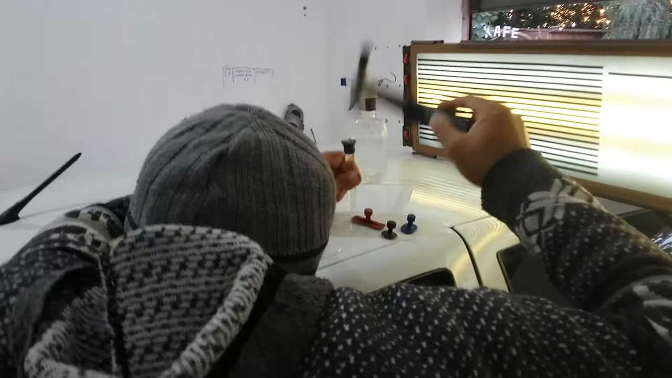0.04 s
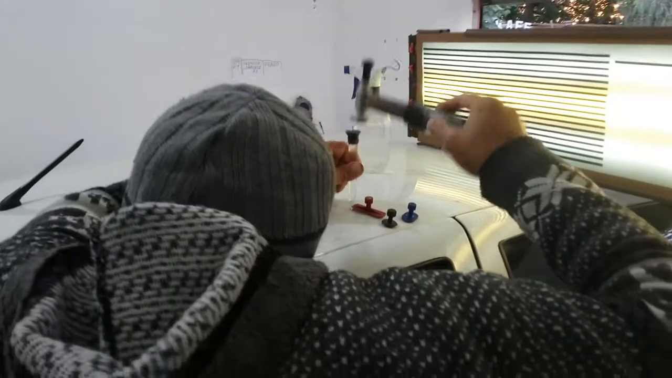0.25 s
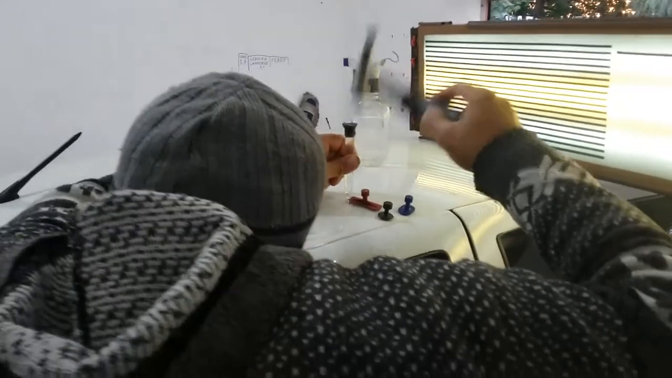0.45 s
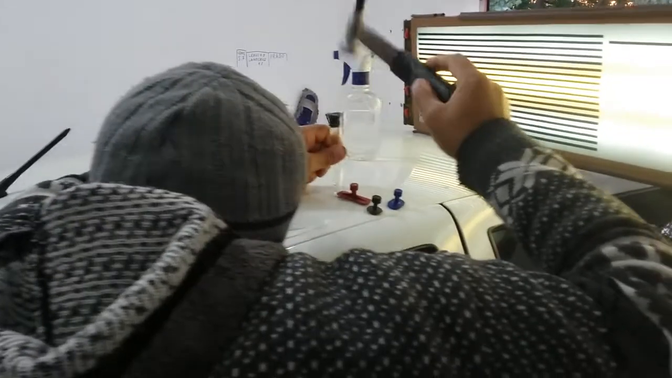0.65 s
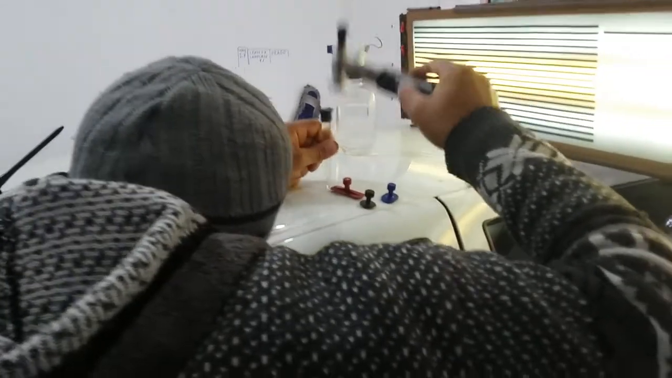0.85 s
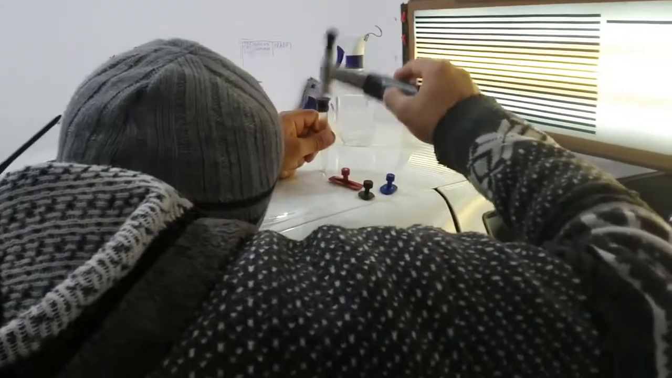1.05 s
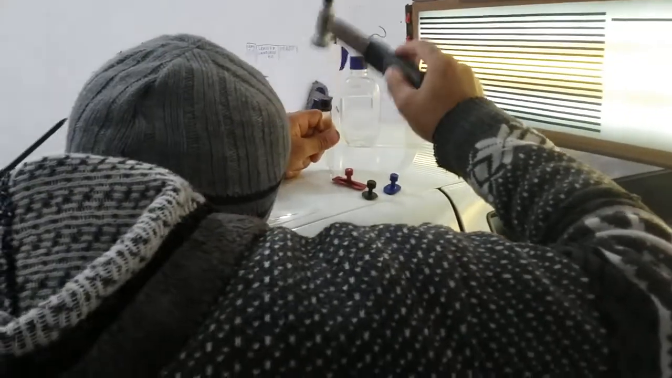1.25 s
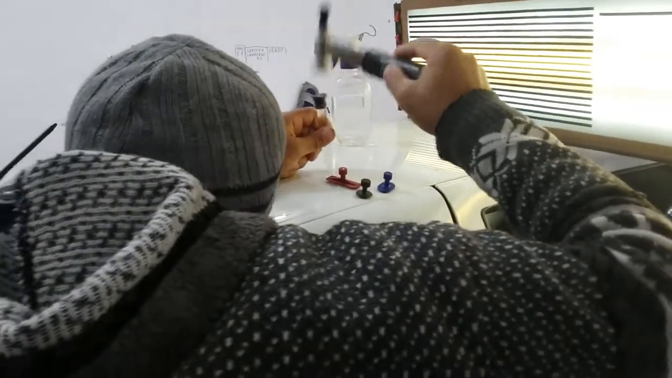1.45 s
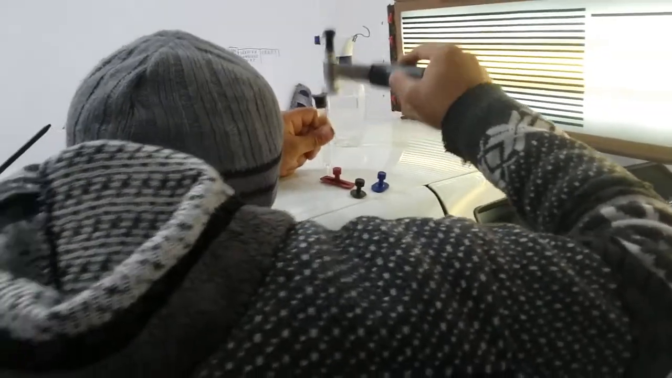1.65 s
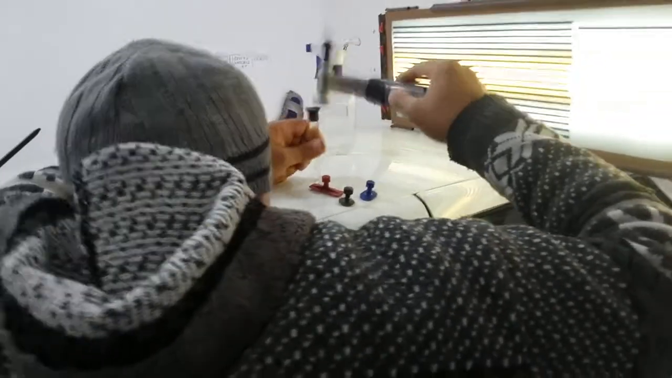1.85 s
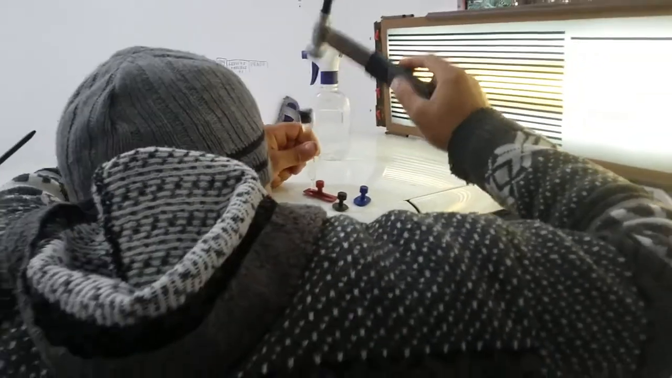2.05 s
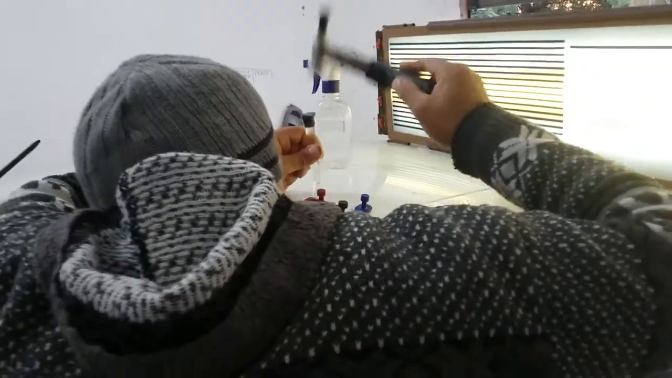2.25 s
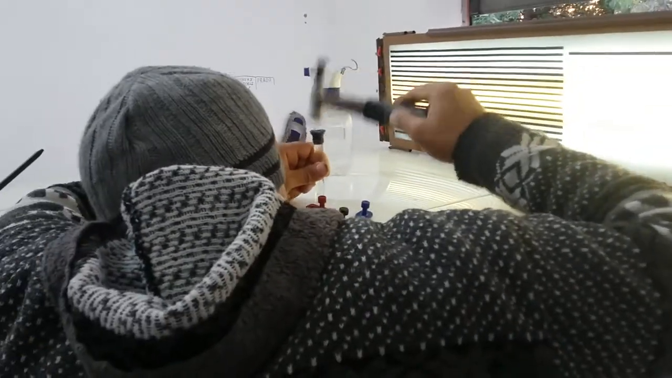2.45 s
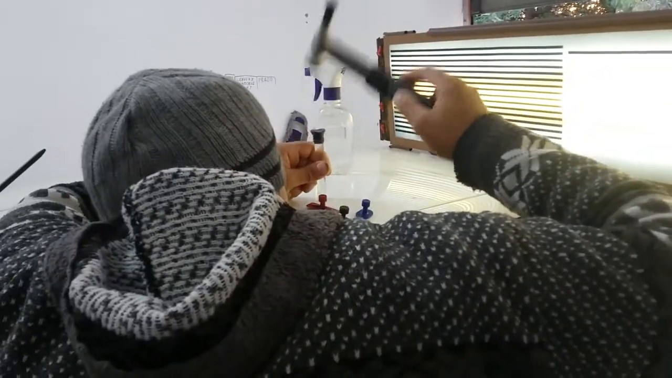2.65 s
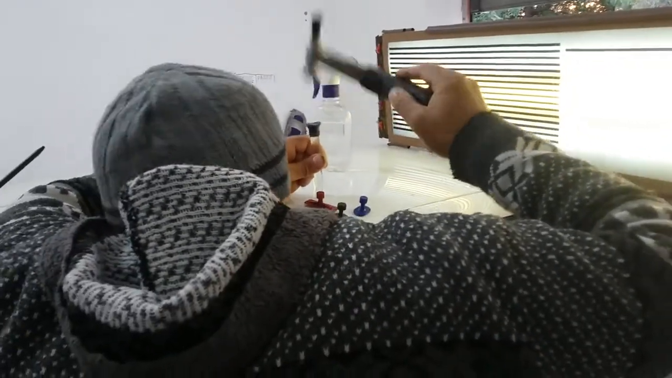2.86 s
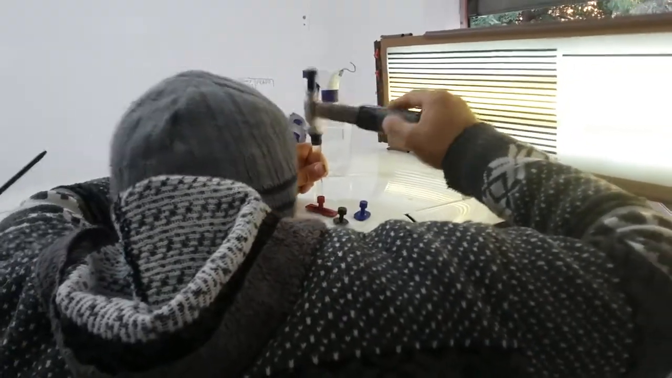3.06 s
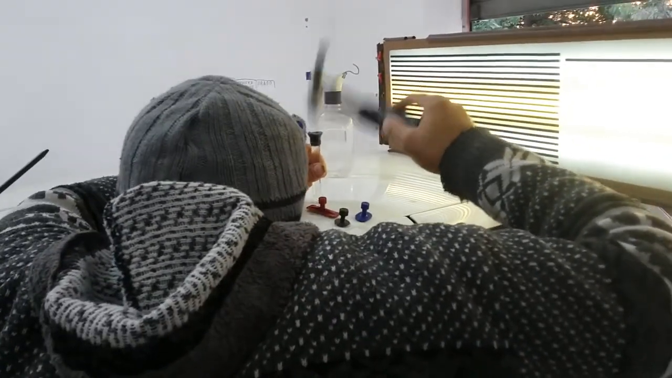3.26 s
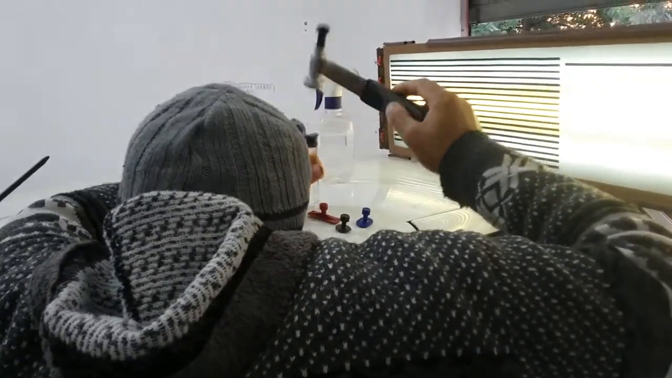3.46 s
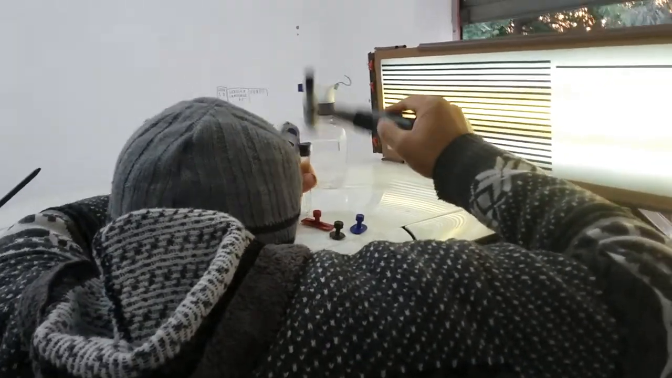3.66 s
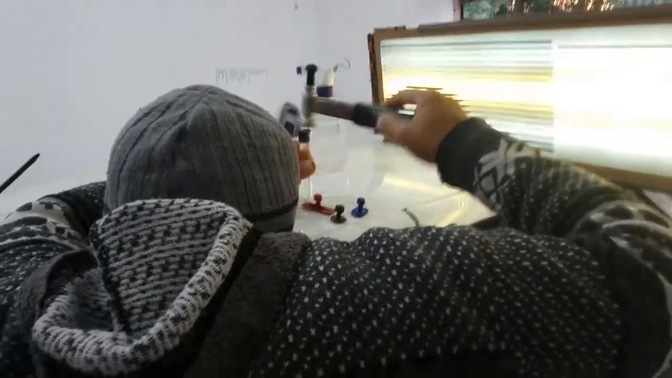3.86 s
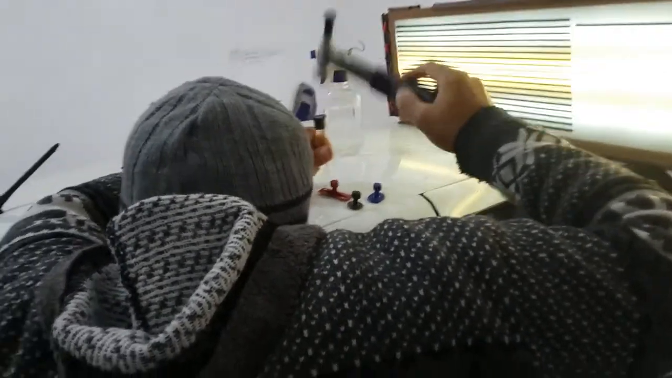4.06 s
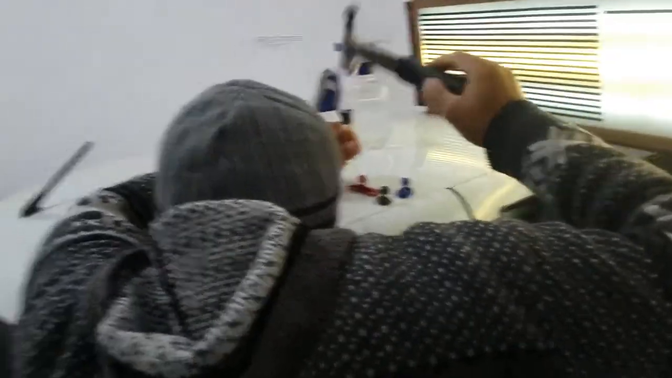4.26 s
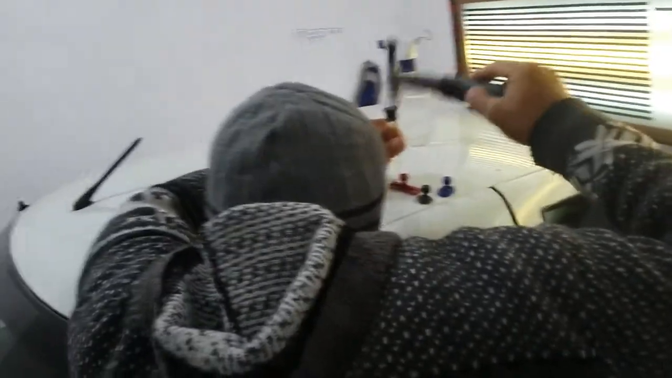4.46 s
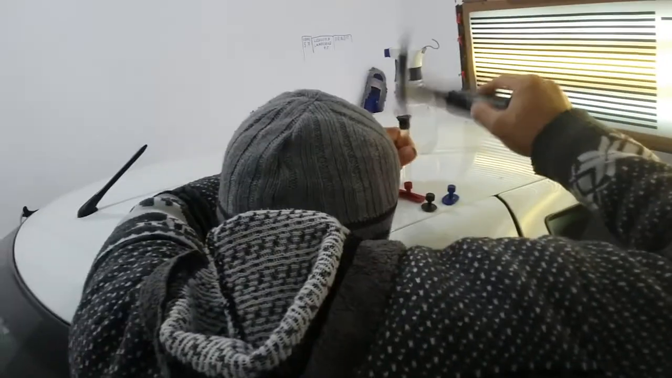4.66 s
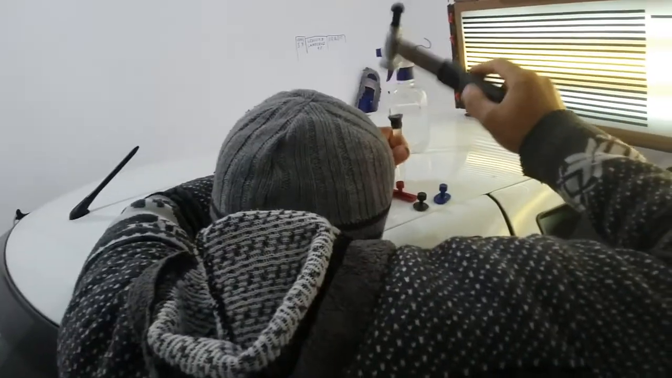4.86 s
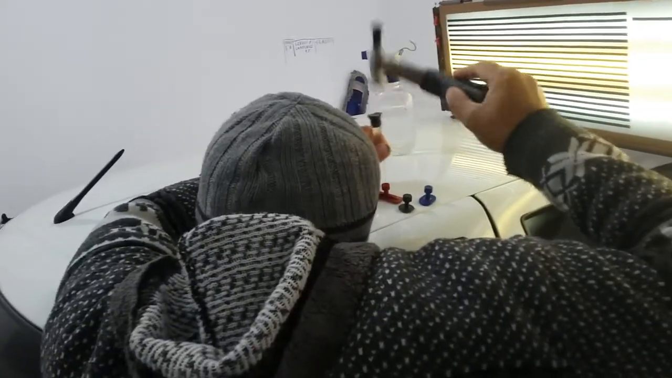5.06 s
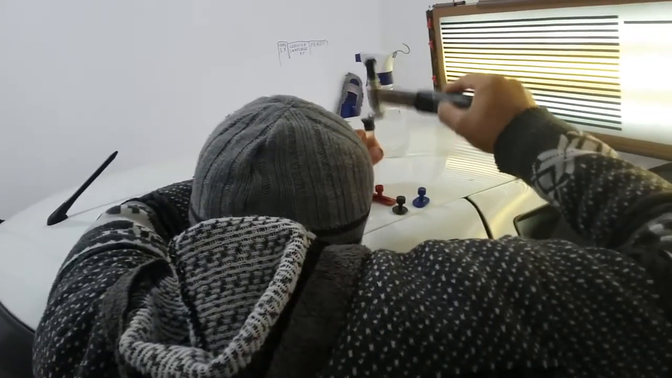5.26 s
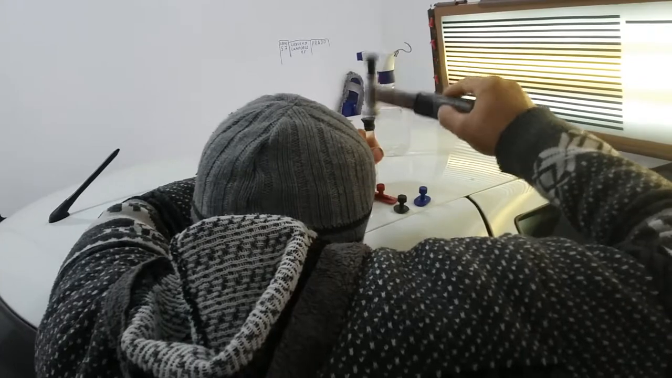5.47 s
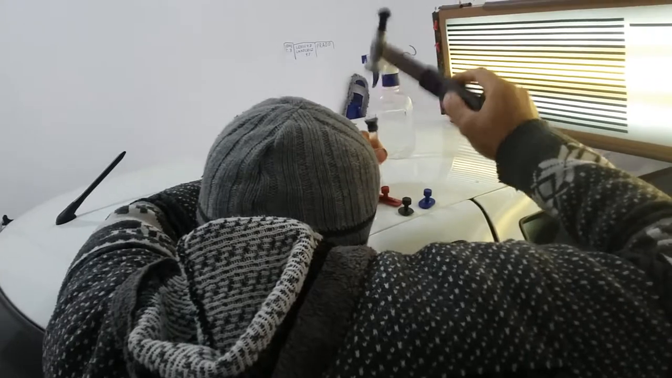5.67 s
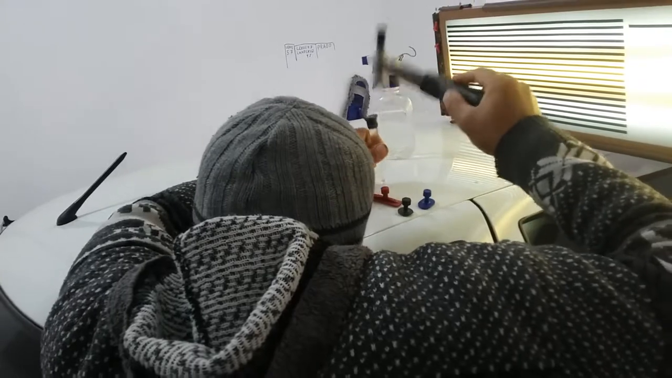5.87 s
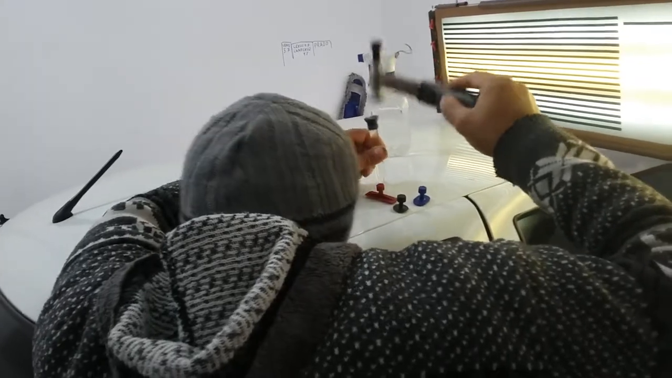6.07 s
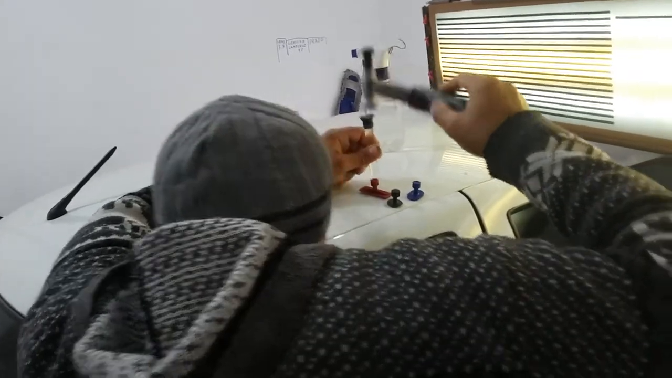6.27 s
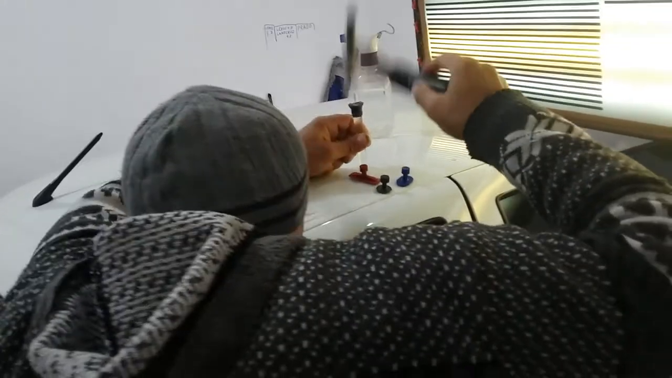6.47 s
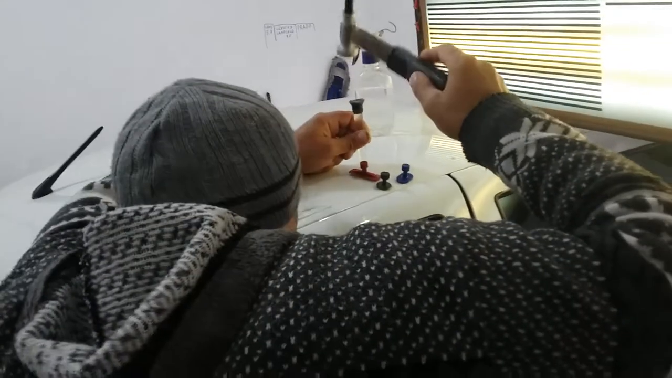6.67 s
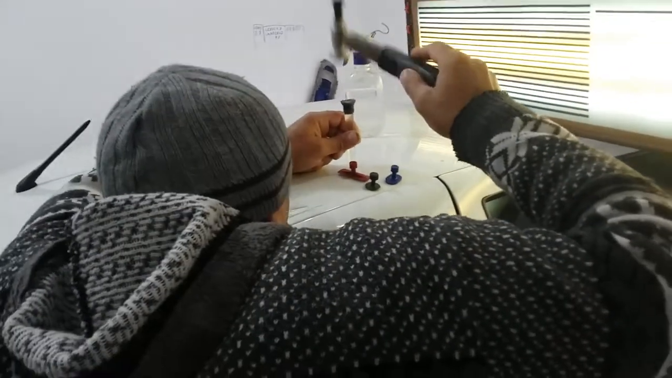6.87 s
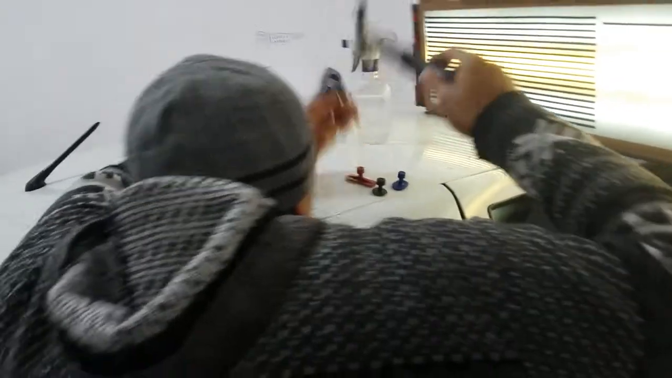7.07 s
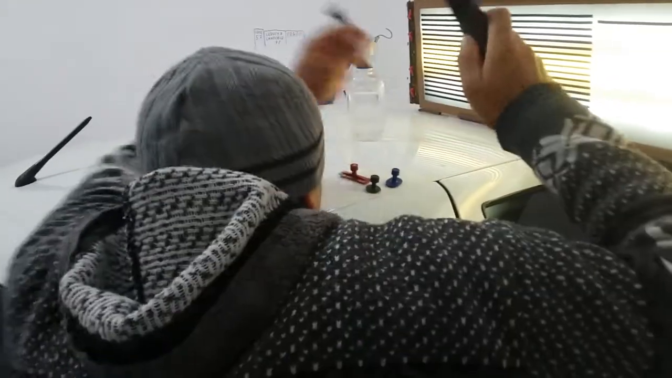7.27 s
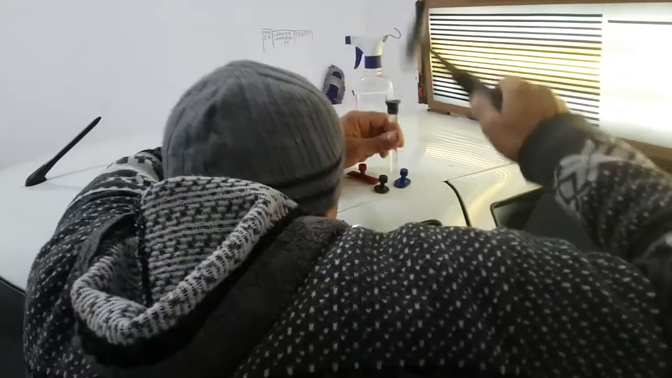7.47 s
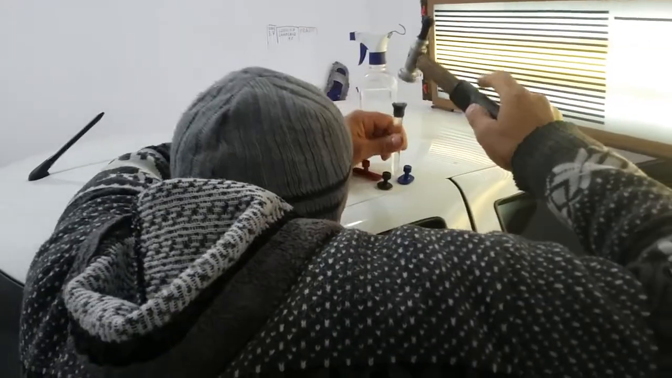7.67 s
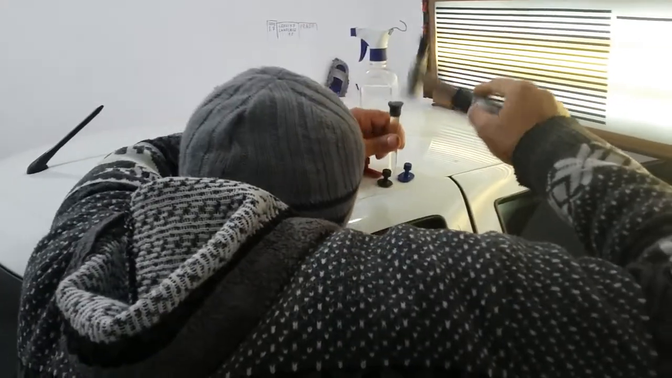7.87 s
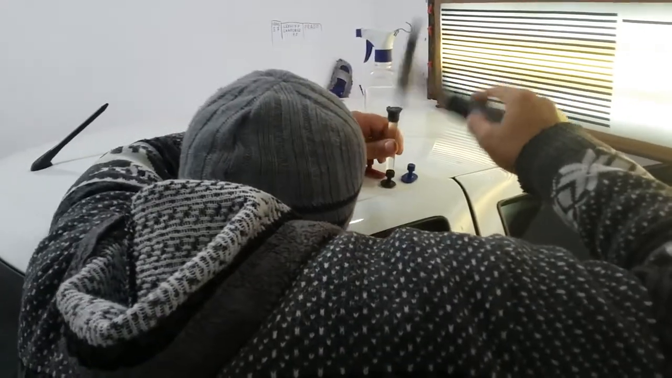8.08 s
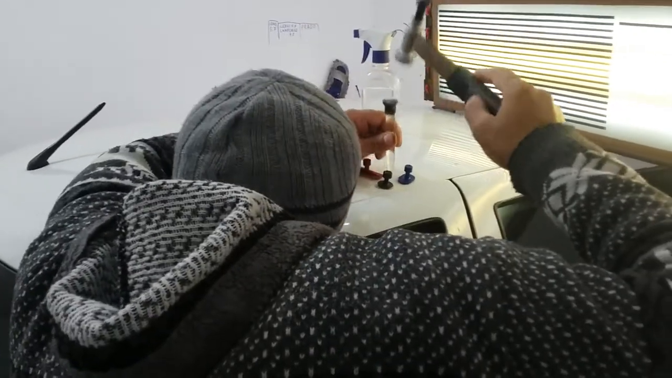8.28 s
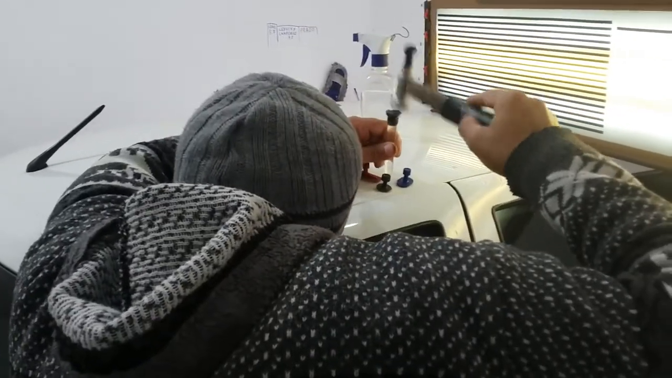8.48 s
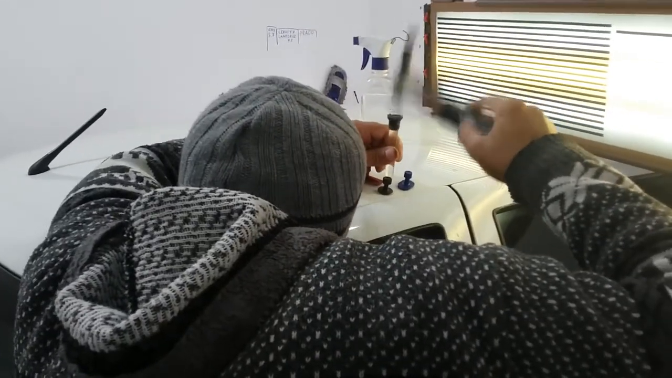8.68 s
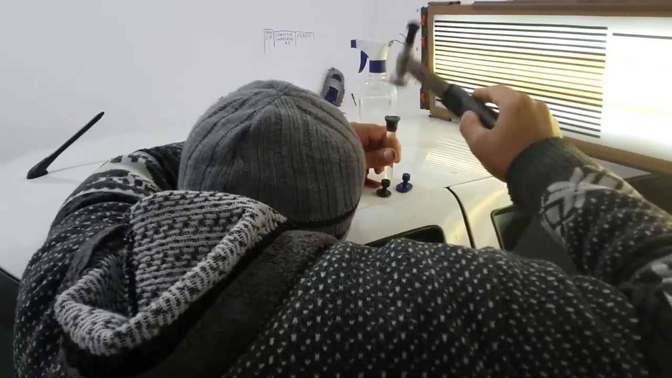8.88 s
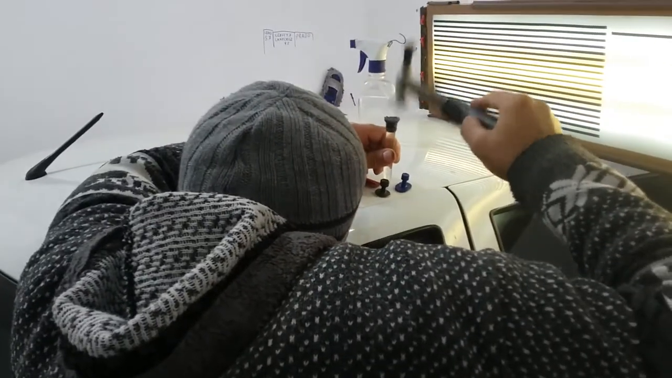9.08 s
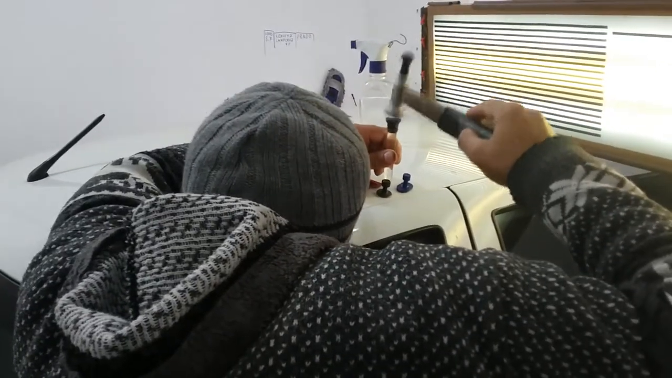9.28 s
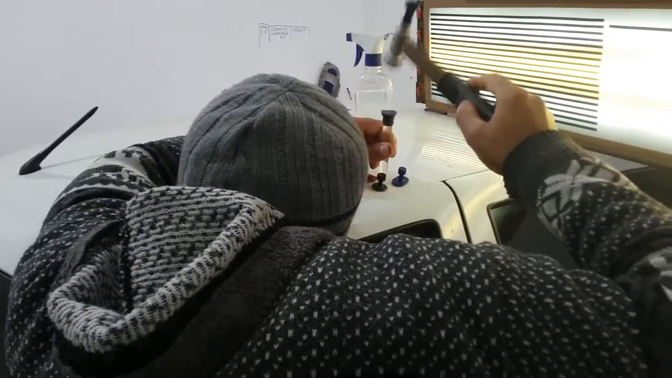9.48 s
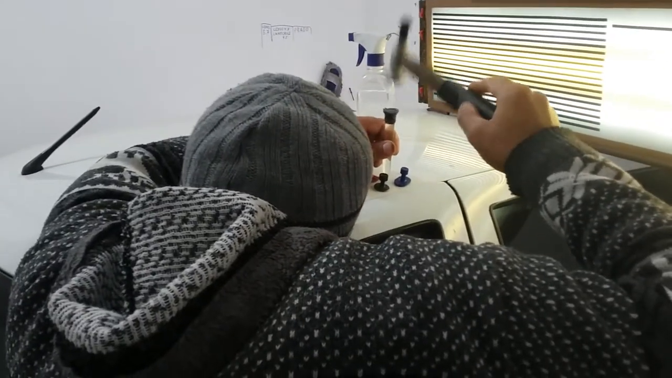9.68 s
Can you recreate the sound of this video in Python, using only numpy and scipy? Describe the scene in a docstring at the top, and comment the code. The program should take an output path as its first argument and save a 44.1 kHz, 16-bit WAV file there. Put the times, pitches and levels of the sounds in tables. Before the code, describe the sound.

Quick, even hammer taps on a steel punch, heard near the microphone in a hard-walled room. Every blow is a crisp tick-click with a boomy sheet-metal ring fading in under a second, overlapping the next. Occasional thin rebound ticks slip between blows. One pause of about a second holds soft knocks, dull room noise and faint hum before the tapping picks up again to the end.

```python
"""From the start a small hammer taps a punch on a steel car roof in a bare workshop, about 3.6 times a second.
Each tap is a double click of short decaying sines; noise bands and longer sines make the roof drum and clang.
The punch moves to a second spot after 2.7 s and a third after 6.2 s; the hammer now and then bounces back.
Tapping pauses after 7.1 s, light touches set the punch down on a fourth spot, and it resumes at 8.2 s.
Throughout, shaped noise makes a dull room sound, loudest at the end, and a wavering sine makes a low hum,
loudest in the pause before tapping resumes."""
import sys
import numpy as np
from scipy import signal
from scipy.fft import rfft, irfft, next_fast_len
from scipy.io import wavfile

SR = 44100
rng = np.random.default_rng(int(sys.argv[2]) if len(sys.argv) > 2 else 0)


def to_wav(s):
    """Save 16-bit WAV."""
    ch = np.atleast_2d(s).T  # columns
    pcm = np.round(np.clip(ch, -1, 1) * 32767)  # PCM
    wavfile.write(sys.argv[1], SR, pcm.astype(np.int16))


N = 429534   # length in samples

# room noise and hum over time: (time [s], noise level [dB], hum level [dB])
BACKGROUND_LEVELS = [(0, -46, -56), (2.0, -50, -56), (2.6, -35.5, -47), (5.4, -51, -55), (6.1, -38, -47.5),
                     (7.8, -33, -39), (9.74, -29, -42)]
# tone colour of the room noise: (frequency [Hz], relative level per Hz [dB])
ROOM_NOISE_COLOUR = [(35, -37), (60, -13), (100, 1.5), (135, 0), (270, -4.5), (500, -8.5), (1000, -9.5),
                     (1600, -11.5), (2400, -18), (3800, -36), (7500, -44), (10000, -52), (15000, -58)]
# light touches of the punch on the roof: (time [s], ring level [dB], click level [dB])
LIGHT_TOUCHES = [(7.6897, -13.5, -17.5), (7.8684, -8.5, -8.5), (8.1, -26, -24)]
# the hammer falls back on the punch: (time [s], level [dB])
HAMMER_REBOUNDS = [(5.3178, -6.5), (6.4998, -22), (9.0981, -8.5), (9.395, -13)]
# hammer taps; a squarer blow is brighter: (time [s], strength [dB], brightness [dB per octave])
HAMMER_TAPS = [(0.0014, 0.6, 0), (0.3067, 0, 0.06), (0.5621, 0.5, 0.7), (0.8495, -0.2, 1.5),
               (1.1297, -1, 1.05), (1.406, -1.5, 1.14), (1.664, -2.5, -0.7), (1.939, -2.5, -3),
               (2.225, -3, 1.5), (2.5298, -0.2, -2.34), (2.8072, 2.5, -0.5), (3.0941, 0.2, 0.5),
               (3.366, 0.1, 0.5), (3.6468, 3, -0.5), (3.9211, 1.1, 0.2), (4.1907, 2.4, -1),
               (4.4633, 2.2, 0), (4.7575, 2.5, -1.16), (5.0157, 2.5, -0.94), (5.277, 2.5, -0.6),
               (5.5446, 3.5, -1.76), (5.82, 3.5, -1.1), (6.0909, 1.6, -0.5), (6.3229, 0, 2),
               (6.582, 0.5, 0.04), (6.827, -0.4, 0.7), (7.0709, 0.5, -0.6), (8.1777, -2, 3),
               (8.482, -4, 4.5), (8.7756, 0, 1.25), (9.0604, 0.3, 0), (9.3514, -0.6, 1.2),
               (9.6251, -0.5, 2.5)]
# moments after which the punch stands on the next spot: (time [s])
SPOT_CHANGE_TIMES = [2.7, 6.2, 7.5]
# click on spots 1 to 4, one row each; yielding steel softens the contact:
# (level [dB], dulled above [Hz], at most a third of SR)
CLICK_BY_SPOT = [(1.5, 13400), (1.5, 16000), (-1.5, 6700), (2.5, 3500)]
# short resonances of hammer, punch and the steel under its tip:
# (frequency [Hz], width [Hz], relative level [dB])
CLICK_RESONANCES = [(349, 203, -7.5), (990, 1400, -13), (1800, 480, -1), (2310, 580, -3),
                    (4210, 450, -17.5), (6720, 420, -14), (7660, 640, -11.5), (11300, 1500, -19.5)]
# strongest ways the roof vibrates (its modes):
# (frequency [Hz], then relative level with the punch on spot 1, 2, 3, 4 [dB])
STRONG_ROOF_MODES = [(117.1, -43, -53, -45, -61), (128.2, -34, -32, -35, -56),
                     (143.6, -36, -39.5, -33.5, -64), (158.3, -41, -62, -35, -57),
                     (174.26, -29, -27.5, -37.5, -34), (181.9, -34.5, -32, -39, -29),
                     (211.2, -25.5, -24.5, -25.5, -28.5), (239, -44, -33, -37, -46),
                     (268.2, -26.5, -33, -22.5, -24), (288.4, -30, -55, -25, -20.5),
                     (318, -60, -61, -44, -33), (334.3, -36.5, -33.5, -23.5, -25),
                     (364, -31, -39, -26.5, -24), (379.4, -44, -35, -31.5, -27),
                     (408.4, -31, -54, -55, -23), (406, -60, -36.5, -54, -38), (443, -57, -41.5, -58, -26),
                     (459, -27, -37, -48, -31), (477, -34.5, -51.5, -41, -43),
                     (545, -53.5, -42, -34.5, -55), (560, -44.5, -43, -34, -36), (676, -35, -37, -35, -33),
                     (765, -63, -49, -56, -42), (822, -35, -50, -56, -36), (818, -75, -64, -41, -30.5),
                     (888, -115, -54, -40, -50), (1703, -58, -46, -37, -90), (1789, -35.5, -34, -58, -39),
                     (1860, -39, -34.5, -42, -49)]
# the dense weak modes of roof and room:
# (frequency [Hz], then relative third-octave level on spot 1, 2, 3, 4 [dB])
WEAK_MODE_LEVELS = [(67.5, -52.5, -54.5, -57, -42.5), (128.6, -34.5, -38, -42, -47),
                    (202, -23.5, -28, -22.5, -30), (330, -33.5, -33.5, -35.5, -31.5),
                    (540, -30.5, -33.5, -30, -32), (840, -32.5, -33, -34.5, -28.5),
                    (1220, -34.5, -35.5, -40.5, -33.5), (1860, -29.5, -29, -32.5, -32),
                    (2470, -30.5, -31.5, -32.5, -38), (3500, -49.5, -47.5, -56, -49),
                    (4450, -43.5, -41.5, -49, -51), (5600, -49.5, -45.5, -52.5, -53.5),
                    (6850, -42.5, -41, -51.5, -47.5), (9580, -56, -54, -63.5, -66),
                    (12000, -56.5, -53.5, -63, -64), (15500, -67, -63, -81, -77)]
# ringing of roof and room together: (frequency [Hz], time to fall by 60 dB [s])
RING_TIMES = [(70, .75), (150, .76), (220, .82), (330, .88), (500, .8), (2000, .72), (4500, .7),
              (7500, .63), (14000, .45)]

HUM_HZ, HUM_WAVER_HZ = 56, 2   # middle pitch, and typical random drift around it
HUM_SWELL_DB, HUM_SWELLS_PER_S = 3.5, 6   # typical random swell, and new random levels per second
BRIGHT_FROM_HZ, BRIGHT_TO_HZ = 780, 9000   # the brightness of a blow tilts the spectrum between these
CLICK_HZ = 3000   # the part of a blow's spectrum that sets the level of its click
BANDS_HZ = 63 * 2 ** (np.arange(49) / 6)   # band centres, a sixth of an octave apart
AGE = np.arange(SR) / SR   # seconds since a blow
TOP_CUT_HZ = 16300


def from_db(db):
    """Turn decibels into a factor for the wave."""
    return 10 ** (np.asarray(db) / 20)


def rms_one(x):
    """Scale a sound to an average strength (rms) of 1."""
    return x / np.sqrt(np.mean(x ** 2) + 1e-20)


def early_rms_one(x):
    """Scale a ringing sound to rms 1 over its first fifth of a second."""
    early_power = np.mean(x[..., :SR // 5] ** 2, axis=-1, keepdims=True)
    return x / np.sqrt(early_power)


def at_hz(points, hz, column=1):
    """Read a column of a table, with frequencies spaced as the ear hears them (log scale)."""
    points = np.array(points)
    return np.interp(np.log(hz), np.log(points[:, 0]), points[:, column])


def add(track, time_s, sound):
    """Mix a sound into the track at a time, cutting it off at the end."""
    start = max(round(time_s * SR), 0)
    track[start:start + len(sound)] += sound[:N - start]


def dull(sound, above_hz):
    """Gently soften the treble, as a soft contact does."""
    sos = signal.butter(1, min(above_hz, SR / 3), fs=SR, output="sos")
    return signal.sosfilt(sos, sound)


def cut_bass(sound, below_hz, order=2):
    """Take away the sound's slow vibrations."""
    return signal.sosfilt(signal.butter(order, below_hz, "high", fs=SR, output="sos"), sound)


def band_noise(low_hz, high_hz, size):
    """Steady noise in one band, at rms 1; the filter gets half a second to settle first."""
    sos = signal.butter(3, [low_hz, high_hz], "band", fs=SR, output="sos")
    noise = signal.sosfilt(sos, rng.standard_normal(size + SR // 2))
    return rms_one(noise[-size:])


def background():
    """Dull room noise and a low hum that wavers in pitch and level."""
    t = np.arange(N) / SR
    times, noise_points, hum_points = np.transpose(BACKGROUND_LEVELS)
    noise_db = np.interp(t, times, noise_points)
    hum_db = np.interp(t, times, hum_points)

    # colour white noise by weighting its frequencies
    size = next_fast_len(N, real=True)
    hz = np.maximum(np.fft.rfftfreq(size, 1 / SR), 1)
    spectrum = rfft(rng.standard_normal(size)) * from_db(at_hz(ROOM_NOISE_COLOUR, hz))
    noise = rms_one(irfft(spectrum, size)[:N])

    waver = np.interp(np.arange(N), np.linspace(0, N, 100), rng.standard_normal(100))
    swell = np.interp(t * HUM_SWELLS_PER_S, np.arange(100), rng.standard_normal(100))
    # adding up the changing pitch gives the position within the wave
    phase = 2 * np.pi * np.cumsum(HUM_HZ + HUM_WAVER_HZ * waver) / SR
    hum = rms_one(from_db(HUM_SWELL_DB * swell) * np.sin(phase))
    return from_db(noise_db) * noise + from_db(hum_db) * hum


def hold_and_decay(hz, first_share, hold_s):
    """The ring starts at or near full strength, may hold briefly, then dies away; low notes start more slowly."""
    hold = 1 - (1 - first_share) * np.exp(-AGE / hold_s)
    onset = 1 - np.exp(-AGE * np.minimum(hz, 900))
    decay = from_db(-60 * AGE / at_hz(RING_TIMES, hz))
    return onset * hold * decay


def dense_ring():
    """One way for the crowd of weak modes to ring: decaying noise in each band, one per row."""
    edge = 2 ** (1 / 12)   # half a band up or down
    rows = []
    for hz in BANDS_HZ:
        noise = band_noise(hz / edge, hz * edge, SR)
        rows.append(noise * hold_and_decay(hz, first_share=0.9, hold_s=0.054))
    return early_rms_one(np.array(rows))


def punch_click(second_after_s=0.001411, second_db=-5.0, scatter_db=2.0, detune=0.0054,
                crack_db=-18.0, crack_s=0.0015, crack_hz=4500):
    """The hammer meets the punch with a crack, and just after it the punch meets the steel."""
    t = AGE[:SR // 20]
    crack = rms_one(dull(rng.standard_normal(len(t)), crack_hz))
    first = from_db(crack_db) * crack * np.exp(-t / crack_s)
    for k, (hz, width_hz, level_db) in enumerate(CLICK_RESONANCES):
        pitch = hz * (1 + detune * rng.standard_normal())
        # neighbouring resonances push in opposite directions
        gain = (-1) ** k * from_db(level_db + scatter_db * rng.standard_normal())
        decay = np.exp(-np.pi * width_hz * t)   # a wide resonance dies fast
        first = first + gain * np.sin(2 * np.pi * pitch * t) * decay
    lag = second_after_s * rng.uniform(.9, 1.1)
    second = from_db(second_db) * np.interp(t - lag, t, first, left=0)
    return first - second


def touches(low_cut_hz=450, softness_hz=5000, damping_s=0.074):
    """Setting the punch down is a soft contact that mainly wakes the middle modes of the roof."""
    out = np.zeros(N)
    band_gain = from_db(at_hz(WEAK_MODE_LEVELS, BANDS_HZ, column=4))   # spot 4
    ring = band_gain @ dense_ring() * np.exp(-AGE / damping_s)
    for time_s, ring_db, click_db in LIGHT_TOUCHES:
        add(out, time_s, from_db(ring_db) * ring)
        add(out, time_s, from_db(click_db) * punch_click())
    soft = dull(out + 1e-18, softness_hz)
    return cut_bass(soft, low_cut_hz)


def rebounds(ring_db=0.0, low_cut_hz=1500, click_db=1.0):
    """A rebound carries no weight: a thin tick with a bright tail."""
    out = np.zeros(N)
    # every tail uses the levels of spot 4
    band_gain = from_db(ring_db + at_hz(WEAK_MODE_LEVELS, BANDS_HZ, column=4))
    ring = band_gain @ dense_ring()
    for time_s, level_db in HAMMER_REBOUNDS:
        add(out, time_s, from_db(level_db) * ring)
        add(out, time_s, from_db(level_db + click_db) * punch_click())
    return cut_bass(out + 1e-18, low_cut_hz)


def blow_db(strength_db, tilt_db, hz):
    """How hard a blow drives each frequency: evenly in the bass, tilted by its brightness in the treble."""
    rise = (1 + (hz / BRIGHT_FROM_HZ) ** 2) / (1 + (hz / BRIGHT_TO_HZ) ** 2)
    octaves_above = np.log2(rise) / 2
    return strength_db + tilt_db * octaves_above


def roof_wash(wash_db=-3.5, wander=0.54):
    """Taps on one spot ring nearly alike; the pattern of weak modes shifts as the punch creeps."""
    out = np.zeros(N)
    patterns = np.array([dense_ring() for _ in range(6)])
    # no two contacts are equally square, so each favours other parts of the treble
    # (frequency [Hz], random spread [dB])
    scatter_db = at_hz([(600, .8), (2000, 1.5), (4000, 2.2)], BANDS_HZ)
    blend = rng.standard_normal(len(patterns))
    for time_s, strength_db, tilt_db in HAMMER_TAPS:
        spot = np.searchsorted(SPOT_CHANGE_TIMES, time_s)
        # each tap keeps part of the last blend of patterns
        blend = rms_one(rms_one(blend) + wander * rng.standard_normal(len(patterns)))
        spot_db = at_hz(WEAK_MODE_LEVELS, BANDS_HZ, column=spot + 1)
        band_db = spot_db + blow_db(strength_db, tilt_db, BANDS_HZ)
        luck_db = scatter_db * rng.standard_normal(len(BANDS_HZ))
        band_gain = from_db(wash_db + band_db + luck_db)
        add(out, time_s, blend @ (band_gain @ patterns) / np.sqrt(len(patterns)))
    return out


def mode_ring(hz, phase):
    """The strong modes as decaying sines, one per row."""
    hz = hz[:, None]
    tones = np.sin(2 * np.pi * hz * AGE + phase[:, None])
    # a first share of 1 means no hold: the decay begins at once
    return early_rms_one(tones * hold_and_decay(hz, first_share=1.0, hold_s=0.027))


def roof_drum(modes_db=-3.5, scatter_db=2.0, phase_scatter=0.47, detune=0.00596):
    """The strong modes; where the punch stands decides how much of each is woken."""
    out = np.zeros(N)
    modes = np.array(STRONG_ROOF_MODES)
    # each spot has its own starting points within the waves
    phases = rng.uniform(0, 2 * np.pi, (len(SPOT_CHANGE_TIMES) + 1, len(modes)))
    for time_s, strength_db, tilt_db in HAMMER_TAPS:
        spot = np.searchsorted(SPOT_CHANGE_TIMES, time_s)
        # small random changes of level, phase and pitch at each tap
        luck, slip, bend = rng.standard_normal((3, len(modes)))
        hz = modes[:, 0] * (1 + detune * bend)
        mode_db = modes[:, spot + 1] + blow_db(strength_db, tilt_db, hz) + scatter_db * luck
        ring = mode_ring(hz, phases[spot] + phase_scatter * slip)
        add(out, time_s, from_db(modes_db + mode_db) @ ring)
    return out


def hammering():
    """The sharp click of every tap, and the roof that answers it."""
    clicks = np.zeros(N)
    for time_s, strength_db, tilt_db in HAMMER_TAPS:
        spot = np.searchsorted(SPOT_CHANGE_TIMES, time_s)
        click_db, dull_hz = CLICK_BY_SPOT[spot]
        click = dull(punch_click(), dull_hz)
        level_db = click_db + blow_db(strength_db, tilt_db, CLICK_HZ)
        add(clicks, time_s, from_db(level_db) * click)
    return clicks + roof_wash() + roof_drum()


def scene():
    """Background, touches, rebounds and taps add up in the air at one microphone."""
    mix = background() + touches() + rebounds() + hammering()
    return mix[None]   # one channel


def record(dry, ceiling=0.96, bass_cut_hz=42):
    """The deep bass is cut, peaks are rounded, the top is cut."""
    thin = cut_bass(dry, bass_cut_hz, order=4)
    rounded = ceiling * np.tanh(thin / ceiling)
    top_cut = signal.ellip(10, .1, 90, TOP_CUT_HZ, fs=SR, output="sos")
    return signal.sosfilt(top_cut, rounded)


dry = scene()
out = record(dry)
to_wav(out)
```